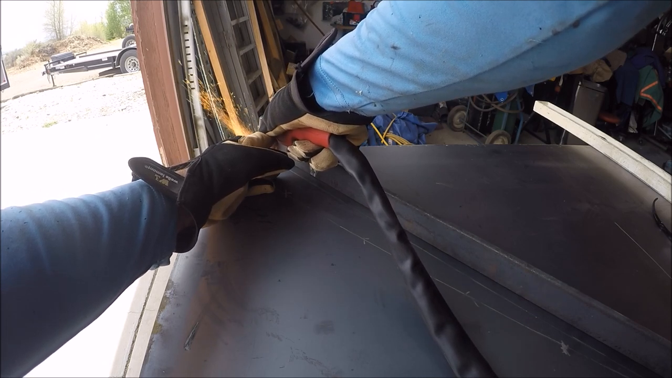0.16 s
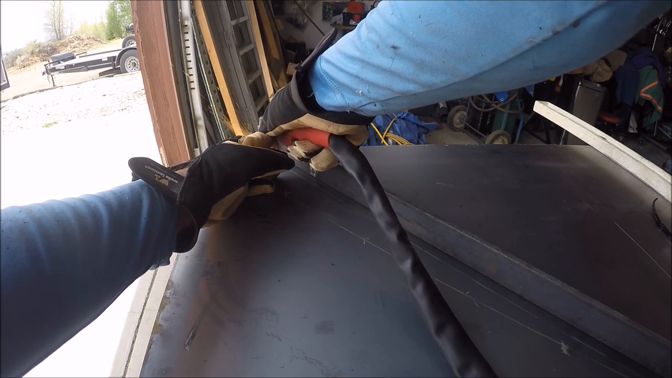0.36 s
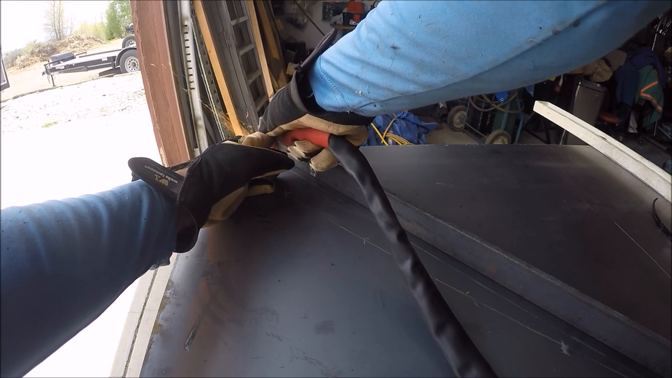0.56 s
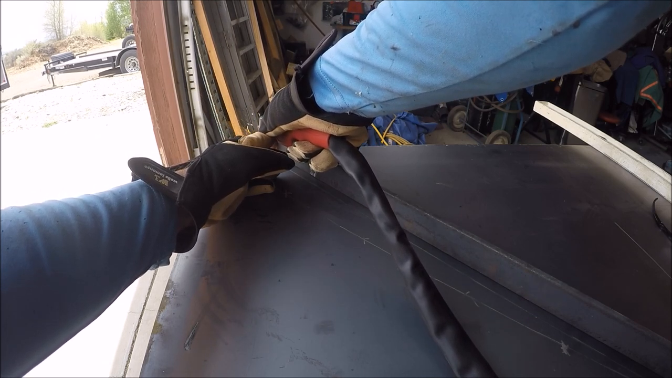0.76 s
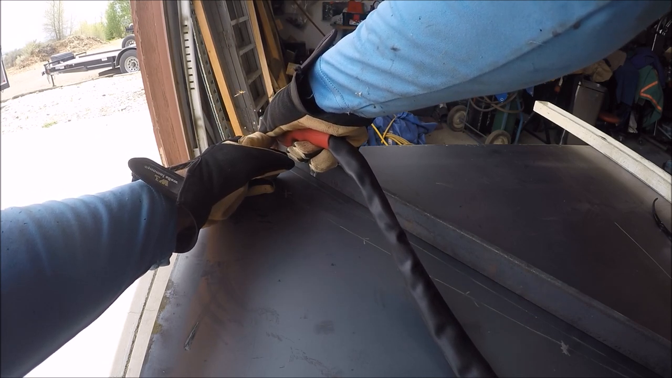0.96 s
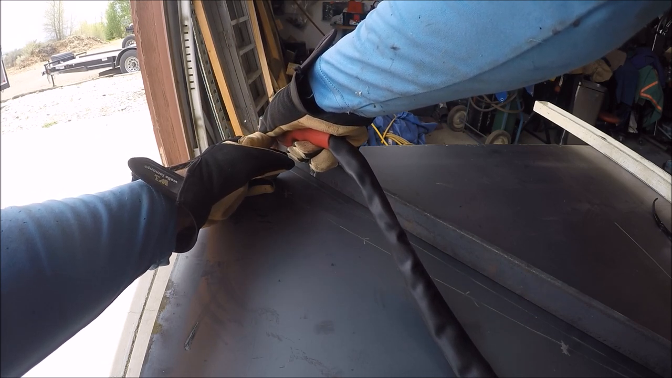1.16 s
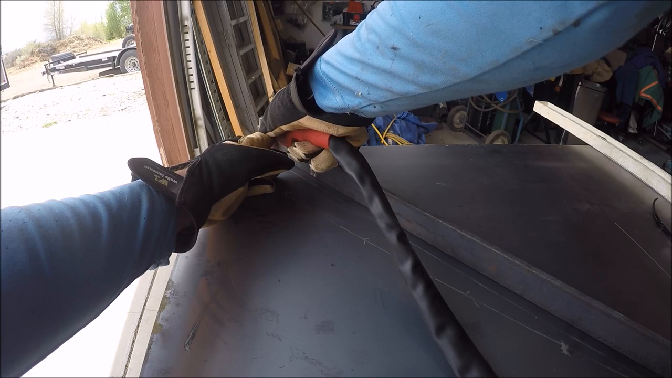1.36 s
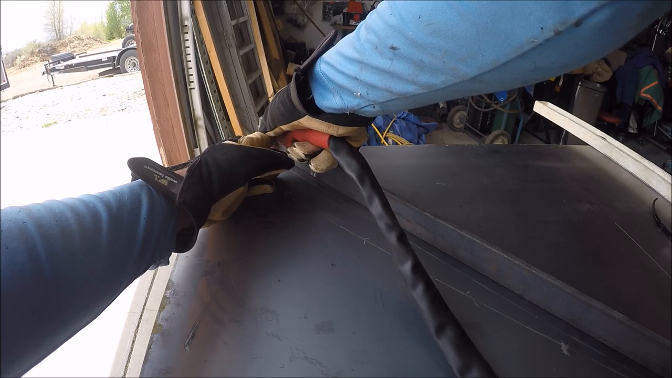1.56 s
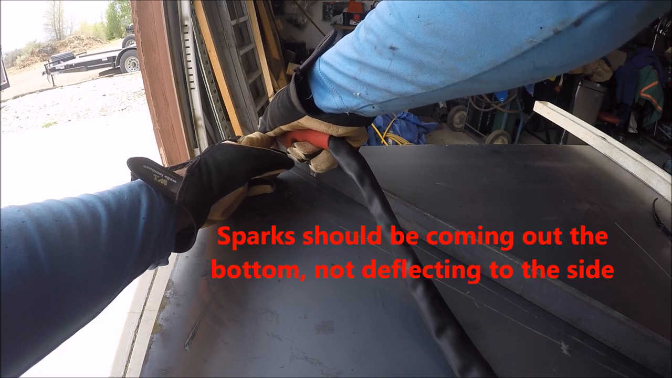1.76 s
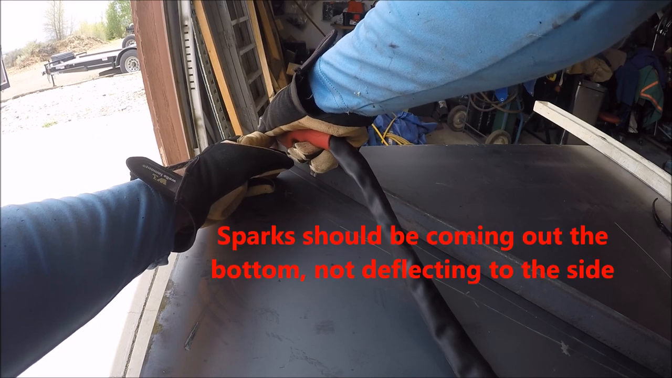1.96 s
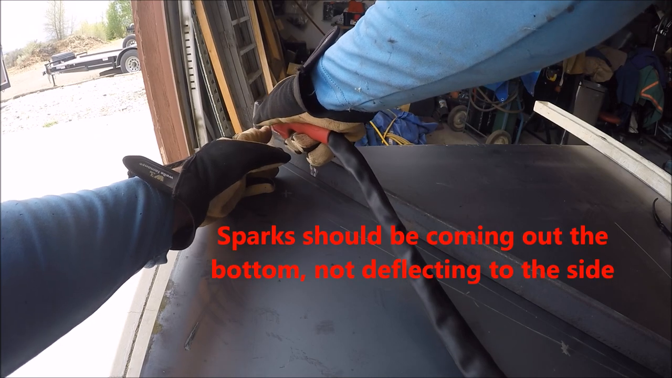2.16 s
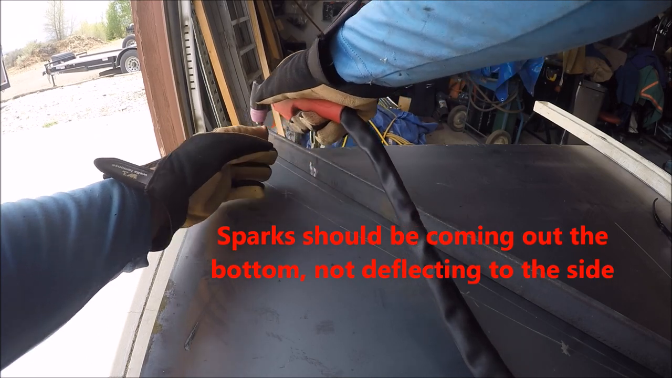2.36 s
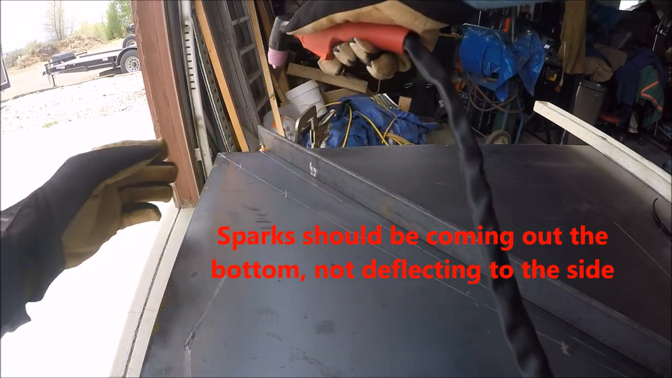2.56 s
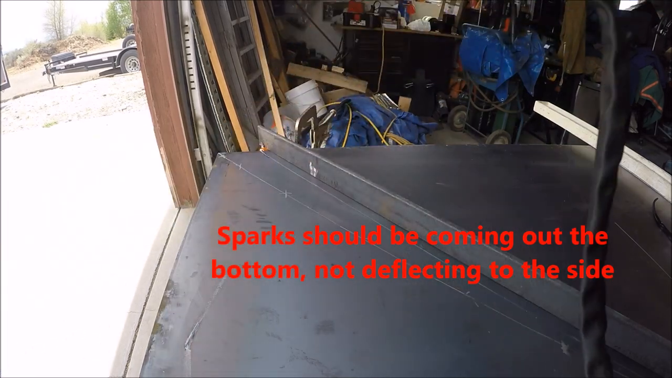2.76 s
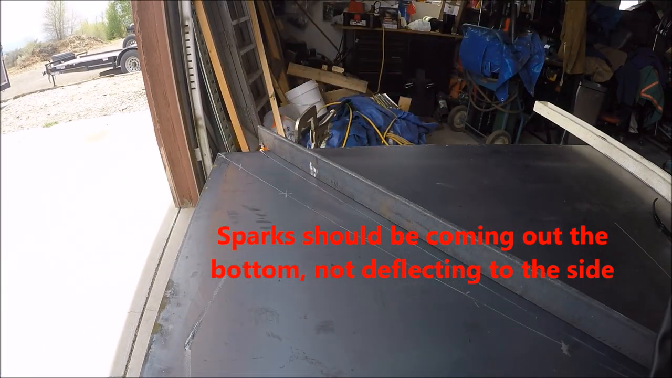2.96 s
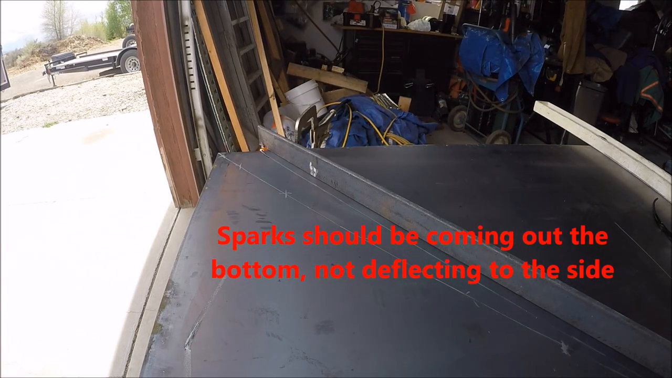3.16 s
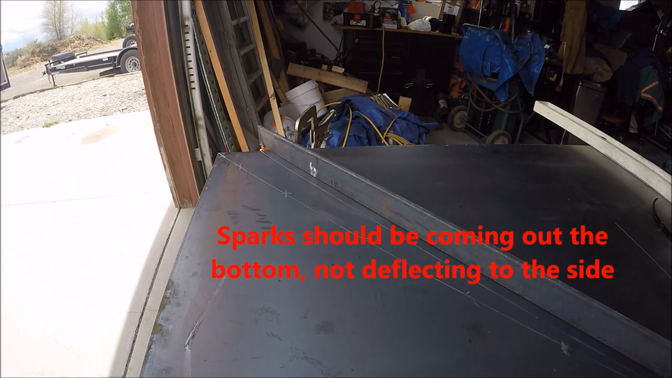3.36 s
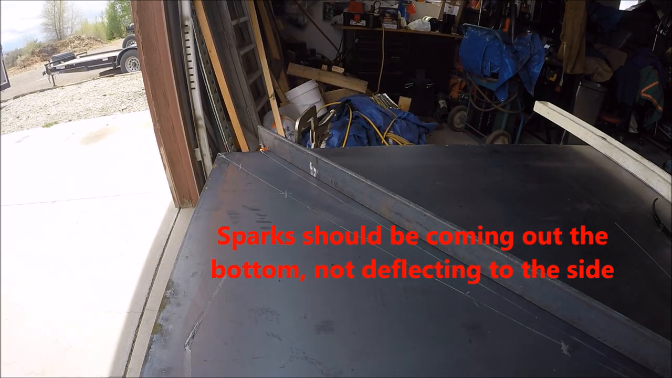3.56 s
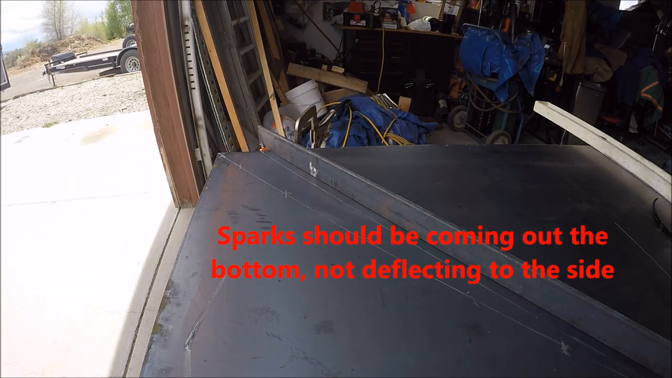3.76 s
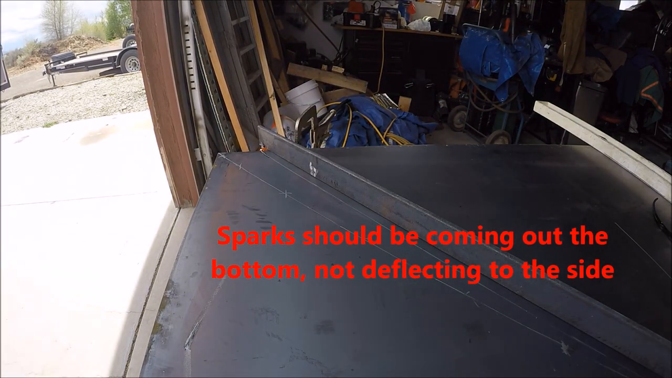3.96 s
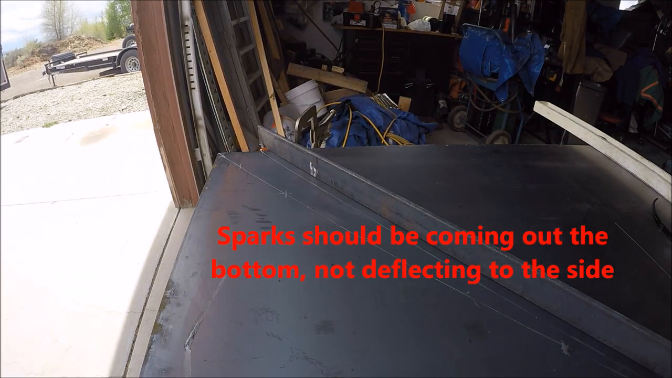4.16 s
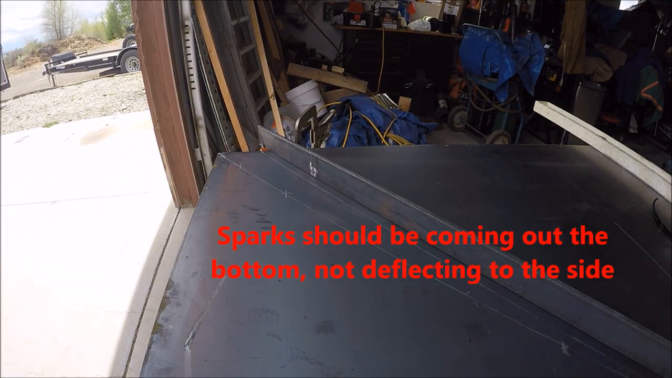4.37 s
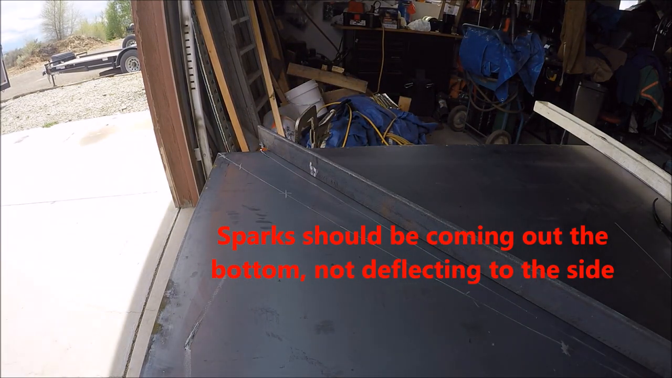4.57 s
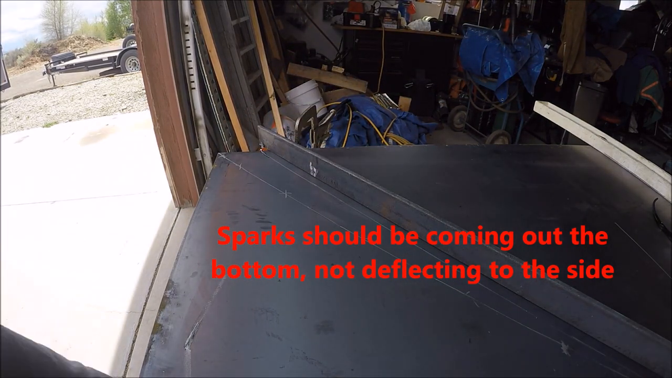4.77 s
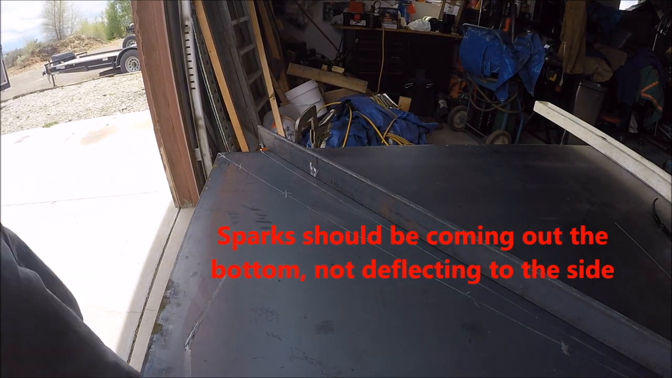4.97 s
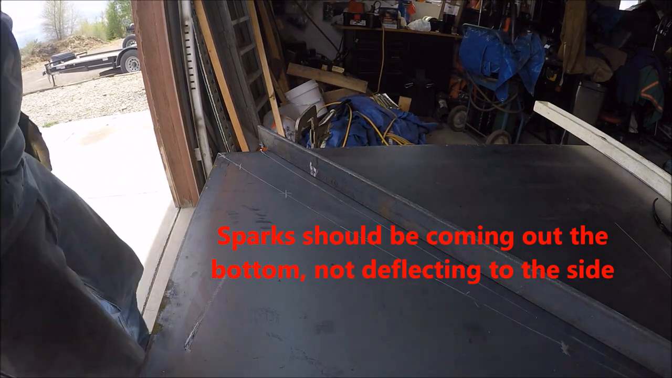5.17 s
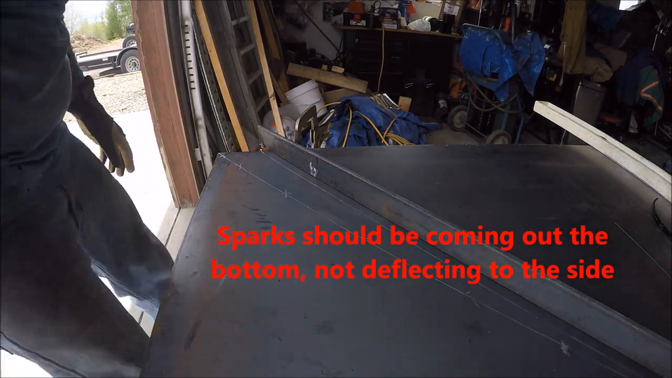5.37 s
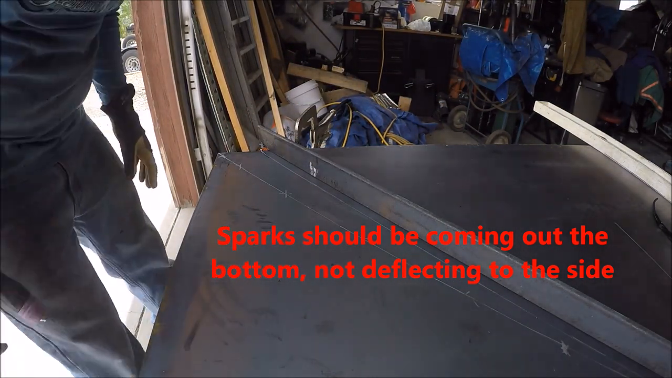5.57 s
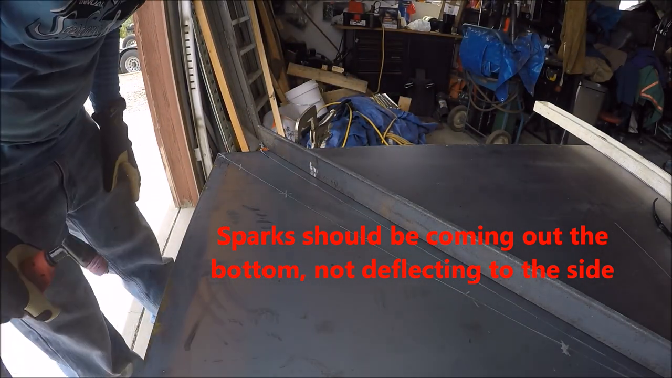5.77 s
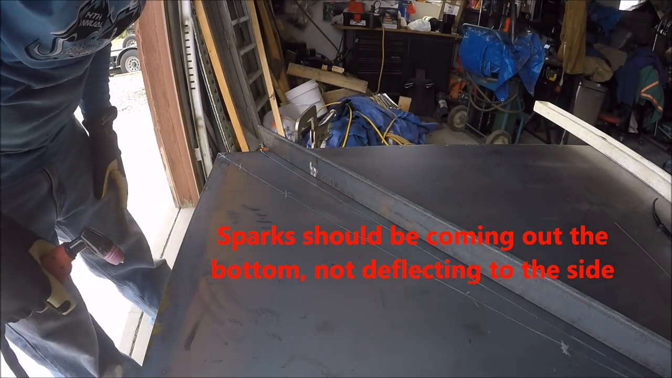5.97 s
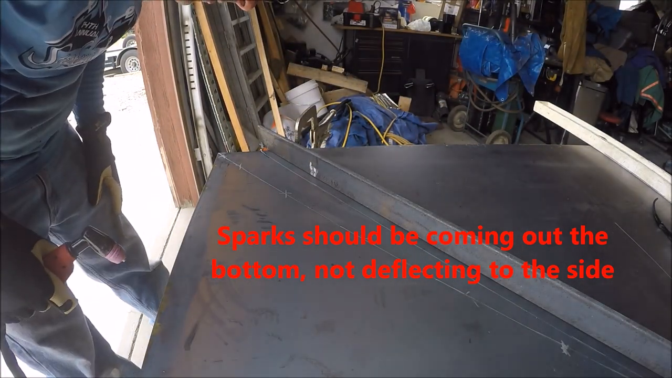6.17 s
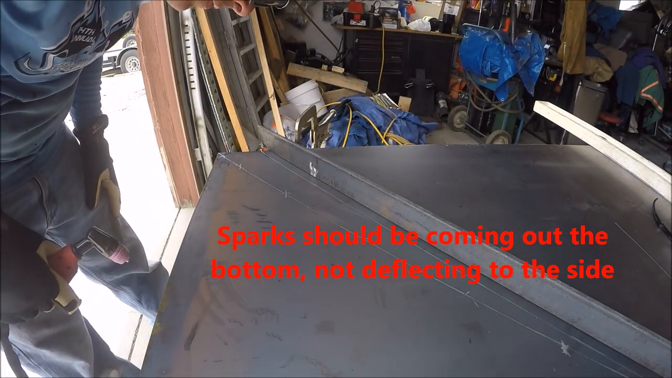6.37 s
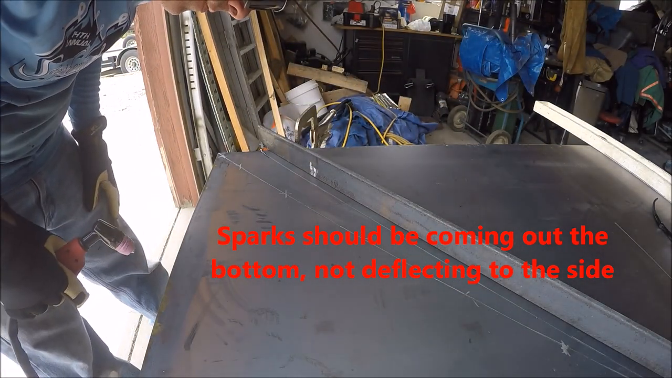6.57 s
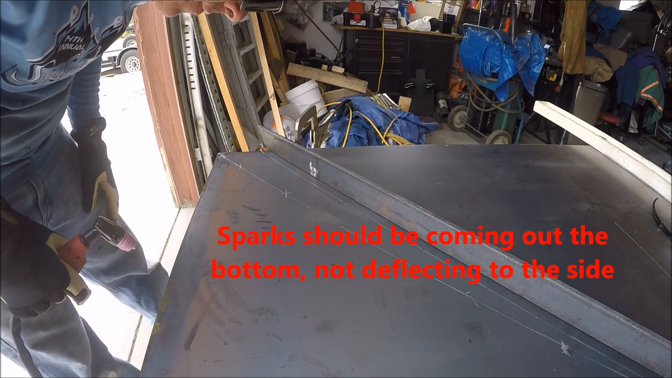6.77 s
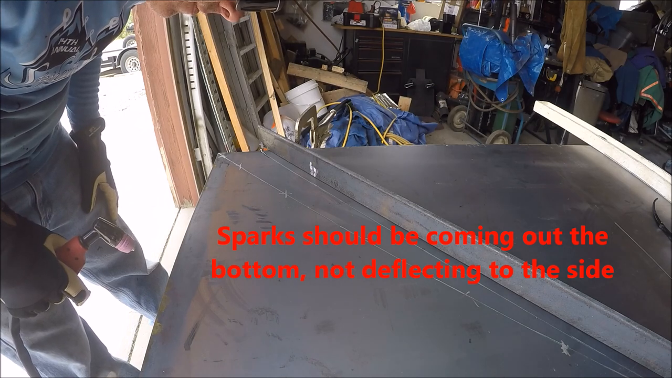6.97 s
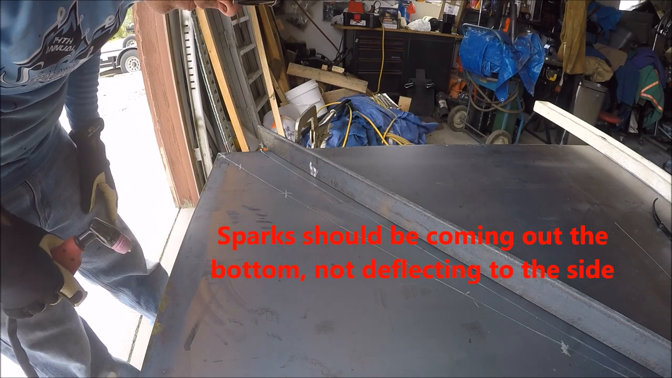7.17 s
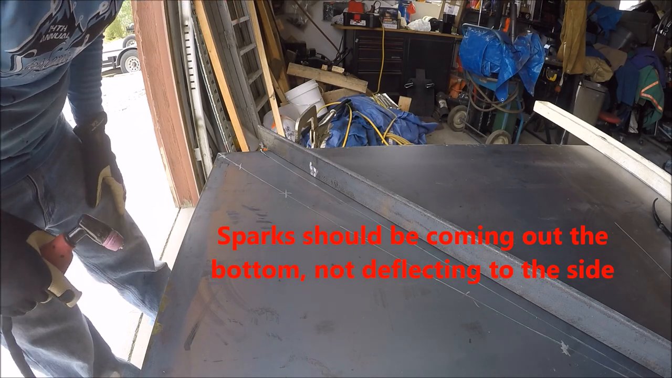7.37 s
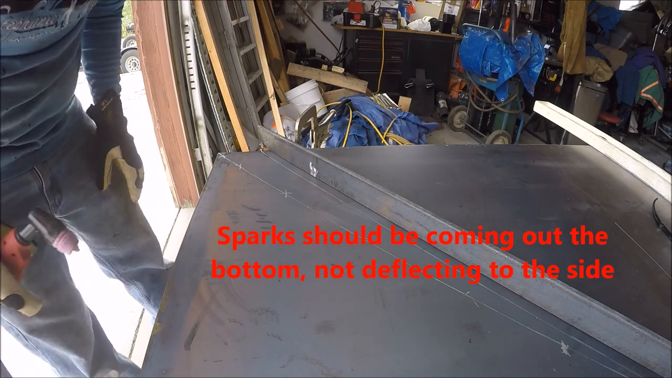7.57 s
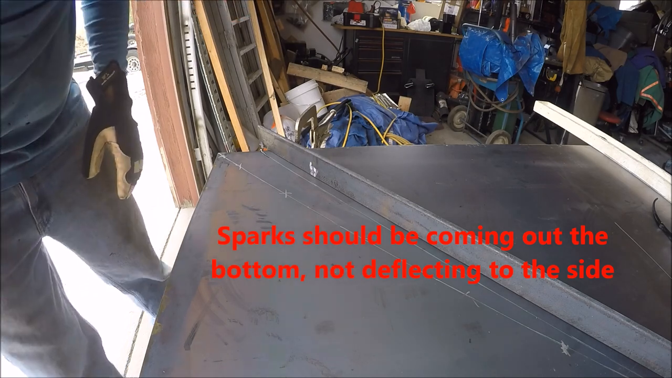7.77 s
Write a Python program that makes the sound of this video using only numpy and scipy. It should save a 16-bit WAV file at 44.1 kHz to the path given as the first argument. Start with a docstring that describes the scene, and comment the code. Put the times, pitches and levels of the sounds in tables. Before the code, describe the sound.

The loud hissing roar of a plasma torch stops abruptly, leaving a softer, shifting jet of air in a workshop.

```python
"""Plasma torch cutting steel plate

In a workshop the arc roars in its slot and goes out with a thump, but the cooling air keeps blowing.
The torch lifts off: the hiss of the slot gives way to a falling whoosh and then to a free jet, whose
beam swings past the listener and turns aside. Each flow is turbulent noise coloured by resonances or
reflections. A low rush, faint tones and dull puffs lie beneath; the worker moves off with a clatter."""
import sys
import numpy as np
from scipy import signal
from scipy.fft import rfft, irfft
from scipy.io import wavfile
from scipy.ndimage import uniform_filter1d

SR = 44100
rng = np.random.default_rng(int(sys.argv[2]) if len(sys.argv) > 2 else 0)


def generate_wav(sig):
    """Save sig (samples, or channels by samples) to the path in sys.argv[1] as 16-bit PCM at SR."""
    pcm = np.round(np.clip(np.atleast_2d(sig).T, -1, 1) * 32767).astype(np.int16)
    wavfile.write(sys.argv[1], SR, pcm)


N = 344414
FRAME, HOP = 1024, 256
HZ = np.fft.rfftfreq(FRAME, 1 / SR)
FRAME_S = np.arange(N // HOP + 5)[:, None] * HOP / SR
TIME = np.arange(N) / SR

# workshop noise spectrum (frequency [Hz], relative level [dB])
SHOP_SPECTRUM = [(20, -16), (55, 8), (90, -14.5), (170, -11), (255, 5), (330, -4.5), (410, -4), (510, -1),
                 (680, 5.5), (800, 4), (940, -5.5), (1500, -9), (2500, -18.5), (8000, -39)]
# its slow drift (time [s], level [dB])
SHOP_LEVEL = [(0, -39), (3.1, -36), (4.5, -39.5), (7.8, -42)]
# faint steady tones (frequency [Hz], level before trim [dB])
FAN_TONES = [(269.2, -54.5), (393.0, -54), (742.9, -51)]
# impacts of a small clatter (time [s], level [dB])
KNOCKS = [(7.532, -23), (7.541, -32), (7.547, -25.5), (7.567, -29)]
# the modes they excite (frequency [Hz], gain [dB], t60 [s])
KNOCK_MODES = [(550, -3.5, 0.046), (667, 0.5, 0.044), (820, -3.5, .045), (1080, -7, 0.033)]
# thumps, gusts and scuffs (time [s], peak [dB], centre [Hz], width [octaves], rise [s], fall [s])
PUFFS = [(1.528, -32, 170, 1.7, 0.003, 0.011), (2.48, -19.5, 612, 0.086, 0.027, 0.036),
         (3.07, -32, 70, 1.3, 0.033, 0.036), (4.3, -32.5, 85, 1.03, 0.023, 0.061),
         (5.3, -35.5, 149, 2.07, 0.12, 0.25), (5.6, -47, 1650, .3, .25, .2),
         (7.78, -39.5, 90, 2.1, 0.17, .1)]

# modes of the gap between nozzle and plate (nominal frequency [Hz], width [Hz], relative level [dB])
GAP_MODES = [(1440, 400, 2), (2570, 320, 2.5)]
# the gap widens (time [s], level [dB], pitch [factor])
GAP_WIDENING = [(2.1, -75, 1.08), (2.27, -30, 0.94), (2.5, -34.5, 1.01), (2.72, -42.5, 0.9),
                (2.92, -46, .88), (3.1, -53, .83), (3.3, -85, .78)]
# colouring by the plate and the gap (frequency [Hz], relative level [dB])
SPLASH_SPECTRUM = [(250, -3), (480, -2), (620, 0.5), (800, -3), (970, -9), (1200, -0.5), (1550, -2.5),
                   (2200, -7.5)]
# air spreading over the plate (time [s], level [dB], roll-off frequency [Hz])
SPLASH_PATH = [(1.6, -59, 1400), (2.05, -32, 1400), (2.33, -25, 1350), (2.5, -22.7, 790), (2.62, -27, 500),
               (2.72, -36, 230), (2.82, -37.5, 140), (3.05, -39.5, 106), (3.4, -44, 55), (4.1, -51, 45),
               (4.5, -79, 45.1)]

# the jet from the front and turned away (frequency [Hz], relative level [dB])
JET_FRONT_SPECTRUM = [(400, -16.5), (850, -8.5), (1400, -14.5), (1900, -20.5), (2150, -11), (2840, -4.5),
                      (3470, 2), (4410, 3), (5780, -3), (6390, -1), (7270, 2.5), (8060, -4), (12190, -8),
                      (15200, -20)]
JET_AWAY_SPECTRUM = [(500, -10.5), (1200, -22.5), (2160, -13), (2890, -11.5), (3280, -5), (4250, -6.5),
                     (5950, 3.5), (6610, -10), (7370, -0.5), (8090, -7), (8940, 5), (11100, -8),
                     (12490, -28), (15200, -29)]
# the same two poses (base level [dB], front spectrum [weight], fizz [dB], echoes [factor])
POSE_FACING = (-26, 1.02, 0.5, 1.0)
POSE_TURNED = (-27.5, 0.1559, -1, 0.3)
# the beam swings past (time [s], half length [s], gain [dB], added tilt [dB/octave], added fizz [dB])
SWINGS = [(3.61, 0.38, 3, 3, -7), (4.258, 0.47, 6.19, 2, -5), (5.125, 0.35, 6.7, 0, 10.5)]
# peaks and troughs of the beam (nominal frequency [Hz], width [Hz], nominal gain [dB])
BEAM_LOBES = [(3820, 720, 2), (5600, 1200, -4), (7330, 950, 5), (8620, 1060, 4), (10050, 1100, -6.5),
              (11370, 1370, 2), (12920, 600, -1), (14000, 1290, 4)]
# tipping the nozzle scales those lobes (time [s], pitch [factor], strength [factor])
TIPPING = [(2.68, 1.25, 0.22), (3.2, 1.3, 0.3), (3.41, 1.03, 0.49), (4.11, 0.99, 1.05), (4.41, 1.15, 1.24),
           (4.86, 1.4, 0.49), (5.09, 1.439, 0.73), (5.55, 1.76, 1.2)]
# stationary peaks and dips that colour the hiss from about 3 to 4.7 s
# (frequency [Hz], width [Hz], full gain [dB])
HISS_PEAKS = [(2340, 340, 7.5), (4250, 670, -3.5), (5670, 980, 12), (6400, 510, -7)]
# passing side lobes and gaps
# (time [s], half length [s], frequency [Hz], glide [octaves/s], width [Hz], gain [dB])
SIDE_LOBES = [(2.8, .06, 4300, -.8, 500, 3.5), (2.94, .06, 4680, -.3, 450, 6.5),
              (2.9, 0.3, 5910, -.2, 320, 4.5), (3.12, .08, 4700, -.8, 350, 4.5),
              (3.2, .15, 5450, -.2, 600, 3), (3.2, .15, 13140, -.59, 1160, 7),
              (3.32, .11, 8320, -.17, 420, 6), (3.32, 0.16, 9810, -.2, 450, 5),
              (3.43, .13, 6920, -.07, 430, -7), (3.6, .38, 13260, 0, 1350, -4.5),
              (3.62, .2, 12360, .16, 1050, 3.9), (3.7, .28, 9600, -.19, 880, -4.1),
              (3.77, 0.36, 3580, .3, 300, -6), (4.09, .15, 13780, -.15, 990, 6.5),
              (4.2, .14, 10800, .5, 1000, -3.5), (4.27, .24, 12380, -0.059, 1350, -7),
              (4.43, .15, 7440, 0.21, 250, 4.6), (4.48, 0.17, 11420, .47, 1010, 8),
              (4.55, .28, 10080, .16, 490, -6.8), (4.6, 0.46, 9410, .22, 700, 2),
              (4.65, .1, 4750, .57, 440, 5), (4.74, .22, 13800, .08, 1130, 6.5),
              (4.77, 0.19, 5990, .94, 980, -4.5), (4.85, .1, 8870, .23, 1020, -4.5),
              (4.85, .19, 12710, .51, 840, 4.1), (5.03, 0.41, 4460, 0, 5100, 7.5),
              (5.03, .15, 6800, .23, 500, 10), (5.13, .3, 12690, .81, 1280, -5.5),
              (5.33, .08, 13680, -.1, 1150, 8)]
# reflections off the plate, lengthening as the torch rises
# (start [s], end [s], delay when low [ms], delay when raised [ms], nominal reflection [signed factor])
PLATE_ECHOES = [(2.223, 3.37, .641, 1.221, .13), (2.455, 3.13, .309, .845, -.08),
                (2.659, 3.25, .603, 1.026, -.085), (2.478, 3.33, .651, 1.289, -.11),
                (1.987, 3.604, .567, 1.213, .08)]

# modes between torch, gloves and plate (nominal frequency [Hz], width [Hz], nominal gain [dB])
CAVITY_MODES = [(652, 277, 13), (1180, 72, 3), (1560, 1040, 7), (2770, 430, 7), (3160, 170, 3.5),
                (3820, 250, 4), (4210, 320, 3.5), (4660, 580, 5.5), (5855, 790, 11), (7270, 1300, 9.5),
                (8710, 1440, 13.5), (10680, 1270, 9), (12350, 400, 2), (14800, 800, 1.5)]
# the hands shift along the cut and scale those modes (time [s], pitch [factor], strength [factor])
GRIP = [(0, 1, 0.87), (.9, 1.01, 1.05), (1.5, 1.05, 1.1), (2.1, 0.98, 0.89), (2.35, 1, 0.7)]
# air alone in the slot (frequency [Hz], relative level [dB])
SLOT_AIR_SPECTRUM = [(40, -24), (150, -14), (300, -3), (600, -3.5), (950, -12.5), (1200, -3.5), (2300, -6),
                     (3500, 1.5), (5300, -3.5), (6700, -8.5), (8000, -18), (10000, -17), (13000, -17.5),
                     (15000, -21)]
# slot resonances without the arc (nominal frequency [Hz], width [Hz], full gain [dB])
SLOT_PEAKS = [(2320, 300, -3), (3620, 100, 3), (4050, 190, -1.5), (4360, 490, 5), (7120, 320, 5.5),
              (7700, 800, -2), (8900, 400, 2), (9950, 450, -4), (10900, 500, 2.5), (11650, 350, -2),
              (12300, 400, 5), (13800, 600, -6), (14550, 500, 3)]
# roar of the arc (frequency [Hz], relative level [dB])
ARC_SPECTRUM = [(40, -26), (150, -9), (300, -4.5), (600, -5), (950, -13), (1200, -3.5), (2300, -2.5),
                (3500, 5), (5300, -0.5), (6700, -7), (8000, -17), (10000, -16.5), (13000, -13.5),
                (15000, -14)]
# narrow resonances of the torch head (nominal frequency [Hz], width [Hz], nominal gain [dB])
TORCH_PEAKS = [(2400, 200, -2), (3255, 89, 7.5), (3480, 130, -3), (3810, 100, 5.5), (4600, 60, 4),
               (4805, 40, 8), (4890, 60, -5), (5170, 150, 3), (7040, 200, 3.5), (7260, 110, -9)]

ARC_OUT_S, ARC_FADE_S = 1.523, .002
# movements of the torch (start [s], end [s])
SLOT_OPENS_S, UNSEAT_S, JET_CLEAR_S = (1.9, 2.35), (2.14, 2.98), (2.31, 2.6)
LIFT_S, LOWER_S, TURN_AWAY_S = (2.4, 3.4), (3.6, 5.1), (4.28, 5.9)
LEAVE_S, LEAVE_DB_PER_S = 7.6, 13  # the worker steps off with it
# the hiss peaks fade in and out (start [s], end [s])
PEAKS_IN_S, PEAKS_OUT_S = (3, 3.31), (4.16, 4.72)


def amp(db):
    """Amplitude ratio of a level in decibels."""
    return 10 ** (np.asarray(db) / 20)


def decibels(gain):
    """Level in decibels of an amplitude ratio."""
    return 20 * np.log10(gain + 1e-6)


def ease(start, end):
    """Cubic transition from 0 to 1 between two times, at every frame."""
    u = np.clip((FRAME_S - start) / (end - start), 0, 1)
    return u * u * (3 - 2 * u)


def follow(rows):
    """Linear interpolation of each column of a time curve at every frame."""
    s, *columns = np.transpose(rows)
    return [np.interp(FRAME_S, s, column) for column in columns]


def colour(points):
    """Spectral envelope in dB, interpolated on a log-frequency axis."""
    hz, db = np.transpose(points)
    return np.interp(np.log(HZ + 1), np.log(hz + 1), db)


def bell(hz, width, pitch):
    """Gaussian resonance curve; pitch scales its centre and its width at half height."""
    return .5 ** ((2 * (HZ / pitch - hz) / width) ** 2)


def peaks_db(peaks, pitch, strength):
    """Spectral peaks and dips add in decibels and shift together in pitch and strength."""
    return strength * sum(db * bell(hz, width, pitch) for hz, width, db in peaks)


def eddies(frames, bins):
    """Random field of unit variance, correlated over a span of frames and bins."""
    field = rng.standard_normal((len(FRAME_S), len(HZ)))
    field = uniform_filter1d(field, frames, axis=0)
    field = uniform_filter1d(field, bins, axis=1, mode="wrap")
    return field / field.std()


def turbulence(shape_db, level_db, patchy_db=1.0, flutter_db=.3):
    """Turbulent noise: a power-normalised spectrum, modulated by eddies in narrow and broad bands."""
    gain = amp(shape_db + patchy_db * eddies(frames=9, bins=12))
    gain = gain / np.sqrt(np.mean(amp(shape_db) ** 2, axis=-1, keepdims=True))
    gain = gain * amp(level_db + flutter_db * eddies(frames=5, bins=400))
    white = rng.standard_normal((len(FRAME_S) - 1) * HOP)
    spectra = signal.stft(white, nperseg=FRAME, noverlap=FRAME - HOP)[2]
    return signal.istft(spectra * gain.T, nperseg=FRAME, noverlap=FRAME - HOP)[1][:N]


def shop():
    """Ambient noise: the low, even rush of the workshop."""
    return turbulence(colour(SHOP_SPECTRUM), follow(SHOP_LEVEL)[0], patchy_db=.7)


def fan(trim_db=-2, waver_hz=3):
    """Tonal noise, probably of the cutter's cooling fan, with slight random frequency modulation."""
    out = np.zeros(N)
    for hz, tone_db in FAN_TONES:
        drift = uniform_filter1d(rng.standard_normal(N), size=6000)
        turns = np.cumsum(hz + waver_hz * drift / drift.std()) / SR
        out += amp(trim_db + tone_db) * np.sqrt(2) * np.sin(2 * np.pi * turns)
    return out


def walls(direct, t60=0.049, echoes_per_s=2000, tail_db=-15):
    """Early reflections from door frame and clutter join the direct sound and roughen its spectrum."""
    age = TIME[:SR // 4]
    taps = rng.standard_normal(len(age)) * (rng.random(len(age)) < echoes_per_s / SR)
    taps = taps * (age > .003) * amp(-60 * age / t60)
    return direct + amp(tail_db) * signal.fftconvolve(direct, taps / np.linalg.norm(taps))[:N]


def knocks(attack_s=.0007):
    """Impacts excite damped modes: a dull, hollow clatter as the worker moves off."""
    out = np.zeros(N)
    for s, db in KNOCKS:
        age = np.maximum(TIME - s, 0)
        attack = 1 - np.exp(-age / attack_s)
        for hz, mode_db, t60 in KNOCK_MODES:
            out += amp(db + mode_db - 60 * age / t60) * attack * np.sin(2 * np.pi * hz * age)
    return out


def puffs():
    """Band-limited noise bursts: the arc collapsing, a hoot in the gap, gusts, the worker moving."""
    out = np.zeros(N)
    bin_hz = np.fft.rfftfreq(N, 1 / SR) + 1
    for s, db, hz, octaves, rise, fall in PUFFS:
        band = np.exp(-.5 * (np.log2(bin_hz / hz) / octaves) ** 2)
        noise = irfft(rfft(rng.standard_normal(N)) * band, N)
        envelope = np.exp(-np.maximum((s - TIME) / rise, (TIME - s) / fall))
        out += amp(db) * noise / noise.std() * envelope
    return out


def gap_ring():
    """Cavity resonance: the hollow ring under the nozzle sinks as the gap widens."""
    level_db, pitch = follow(GAP_WIDENING)
    bands = sum(amp(db) * bell(hz, width, pitch) for hz, width, db in GAP_MODES)
    return turbulence(decibels(bands), level_db, flutter_db=.5)


def splash(fall_octaves=0.9, rise_db_per_octave=4.0):
    """Jet impingement: from farther off, larger and slower eddies meet the plate, so the whoosh falls."""
    level_db, rolloff_hz = follow(SPLASH_PATH)
    octaves = np.log2((HZ + 15) / rolloff_hz)
    # a gentle slope up to the main eddy size, a steep fall beyond it
    bass_db = rise_db_per_octave * np.minimum(octaves + .5, 0)
    treble_db = -5 * (np.maximum(octaves, 0) / fall_octaves) ** 2
    return turbulence(colour(SPLASH_SPECTRUM) + bass_db + treble_db, level_db)


def echo_db(delay_ms, reflection):
    """Interference with one reflection cuts a comb; stirred air varies its teeth in place and depth."""
    turns = HZ * delay_ms / 1000 + .07 * eddies(frames=14, bins=25)
    reflection = reflection * (1 + .45 * eddies(frames=24, bins=50))
    return 20 * np.log10(abs(1 + np.clip(reflection, -.9, .9) * np.exp(-2j * np.pi * turns)))


def beam_db():
    """Directivity: lobes glide as the torch tips, and side lobes sweep past the listener."""
    shape_db = peaks_db(BEAM_LOBES, *follow(TIPPING))
    for s, half_s, hz, octaves_per_s, width, db in SIDE_LOBES:
        age = np.clip(FRAME_S - s, -2, 2)
        passing = np.exp(-(age / half_s) ** 2)
        shape_db += db * passing * bell(hz, width, pitch=2 ** (octaves_per_s * age))
    return shape_db


def jet(base_tilt=1.56, pivot_hz=6000, fizz_hz=12000, fizz_width_hz=1300, lift_echo=1.2):
    """A free jet beams its treble forward, so level and colour depend on where the nozzle points."""
    away = ease(*TURN_AWAY_S)
    level_db, aim, fizz_db, echoing = (a + (b - a) * away for a, b in zip(POSE_FACING, POSE_TURNED))
    level_db += decibels(ease(*JET_CLEAR_S))
    level_db -= LEAVE_DB_PER_S * np.maximum(FRAME_S - LEAVE_S, 0)
    tilt = base_tilt  # dB per octave
    for s, half_s, gain_db, added_tilt, added_fizz_db in SWINGS:
        on_axis = np.exp(-((FRAME_S - s) / half_s) ** 2)
        level_db += gain_db * on_axis
        tilt += added_tilt * on_axis
        fizz_db += added_fizz_db * on_axis
    shape_db = aim * colour(JET_FRONT_SPECTRUM) + (1 - aim) * colour(JET_AWAY_SPECTRUM) + beam_db()
    shape_db += peaks_db(HISS_PEAKS, pitch=1, strength=ease(*PEAKS_IN_S) * (1 - ease(*PEAKS_OUT_S)))
    shape_db += tilt * np.log2(np.maximum(HZ / pivot_hz, .5))
    # fizz, the highest hiss, has the narrowest beam
    shape_db += fizz_db * (.5 + .5 * np.tanh((HZ - fizz_hz) / fizz_width_hz))
    # echoes are strongest in mid-lift, while the jet still points at the plate
    echoing += lift_echo * np.sin(np.pi * ease(*LIFT_S))
    for start, end, low_ms, raised_ms, reflection in PLATE_ECHOES:
        raised = ease(start, end) * (1 - ease(*LOWER_S))
        shape_db += echo_db(low_ms + (raised_ms - low_ms) * raised, reflection * echoing)
    return turbulence(shape_db, level_db)


def cavity_db():
    """Cavity modes around the seated nozzle shift with the worker's grip."""
    return peaks_db(CAVITY_MODES, *follow(GRIP))


def burning():
    """Gate of the arc: 1 while it burns, falling quickly to 0 when the trigger is let go."""
    return .5 - .5 * np.tanh((TIME - ARC_OUT_S) / ARC_FADE_S)


def slot_air(full_db=-20.5, sag_db=5.5, build_s=0.33, unseat_db=27.5, sink_per_s=0.046):
    """Flow noise excites the slot: it builds up again after the arc and fades as the nozzle leaves."""
    # the resonances sink as the torch eases off the plate and fade as the slot opens
    pitch = 1 - sink_per_s * (FRAME_S - ARC_OUT_S - build_s)
    slot_db = peaks_db(SLOT_PEAKS, pitch, strength=1 - ease(*SLOT_OPENS_S))
    shape_db = colour(SLOT_AIR_SPECTRUM) + cavity_db() + slot_db
    sag = np.clip(1 - (FRAME_S - ARC_OUT_S) / build_s, 0, 1)
    gap = np.maximum(FRAME_S - UNSEAT_S[0], 0) / (UNSEAT_S[1] - UNSEAT_S[0])
    level_db = full_db - sag_db * sag - unseat_db * gap ** 1.42
    return turbulence(shape_db, level_db, patchy_db=.9) * (1 - burning())


def arc_collapse(db=-9, deep_db=-30, start_hz=600, end_hz=44, glide_s=.001, fall_s=.0014, deep_s=.015):
    """Rarefaction pulse: hot gas collapses as the arc dies, a sharp suck dropping to a deep thump."""
    age = np.maximum(TIME - ARC_OUT_S, 0)
    turns = end_hz * age + (start_hz - end_hz) * glide_s * (1 - np.exp(-age / glide_s))
    envelope = amp(db) * np.exp(-age / fall_s) + amp(deep_db) * np.exp(-age / deep_s)
    return -envelope * np.sin(2 * np.pi * turns)


def arc(level_db=-16, sputter=0.053):
    """Turbulent plasma roars through cavity and torch resonances; sputter modulates its amplitude."""
    shape_db = colour(ARC_SPECTRUM) + cavity_db() + peaks_db(TORCH_PEAKS, pitch=1.005, strength=0.71)
    roar = turbulence(shape_db, level_db, patchy_db=.7, flutter_db=.2)
    spits = uniform_filter1d(rng.standard_normal(N), size=40)
    return roar * burning() * np.exp(sputter * spits / spits.std() - sputter ** 2)


def scene():
    """Superposition of the torch, its reflections and the background, alike in both ears."""
    torch = arc() + slot_air() + splash() + gap_ring() + jet() + arc_collapse()
    mono = walls(torch) + shop() + puffs() + knocks() + fan()
    return np.array([mono, mono])


def record(dry):
    """Band limiting: a steep linear-phase low-pass removes the highest treble."""
    lowpass = signal.firwin(801, cutoff=15330, window=("kaiser", 9), fs=SR)
    return signal.oaconvolve(dry, lowpass[None], "same")


dry = scene()
out = record(dry)
generate_wav(out)
```